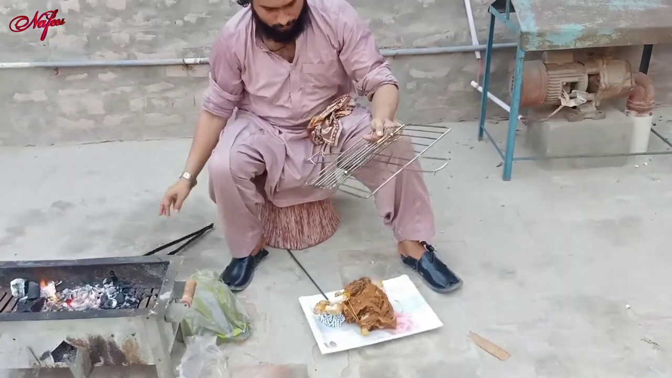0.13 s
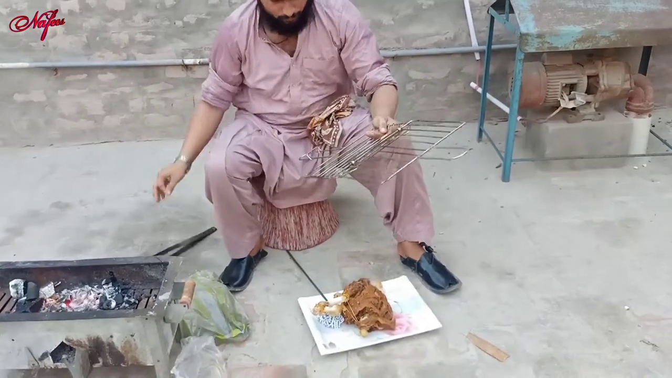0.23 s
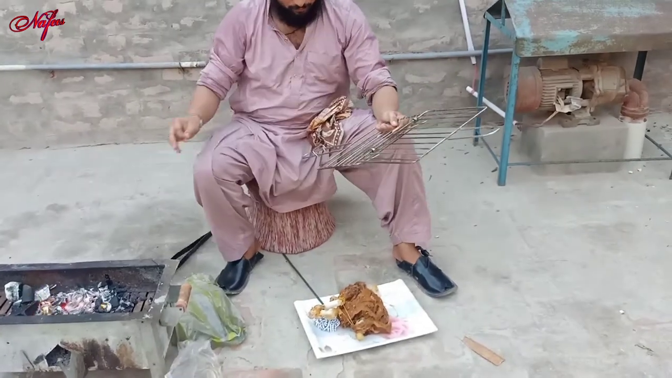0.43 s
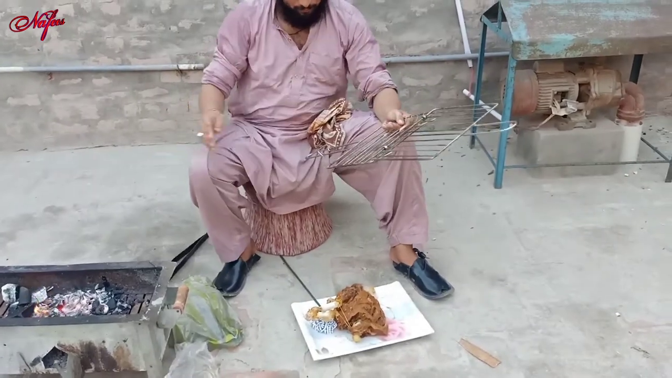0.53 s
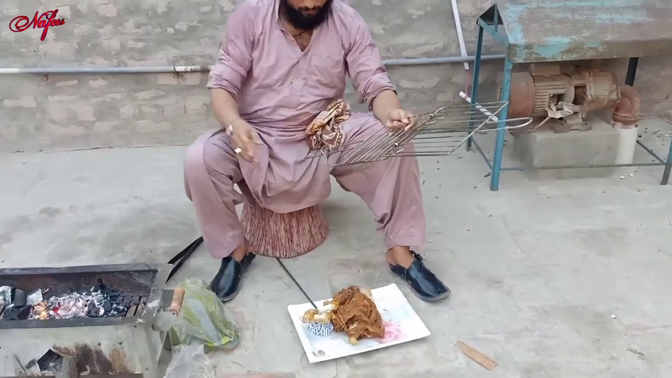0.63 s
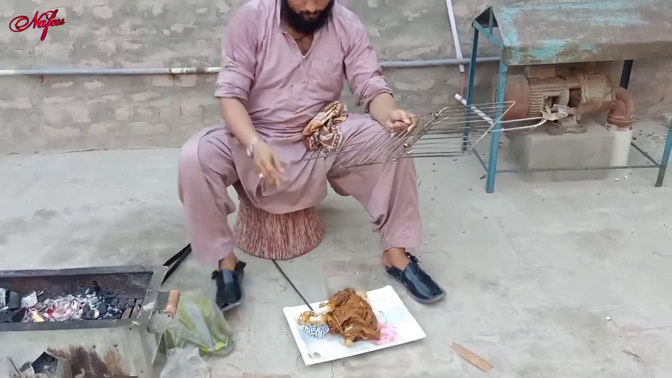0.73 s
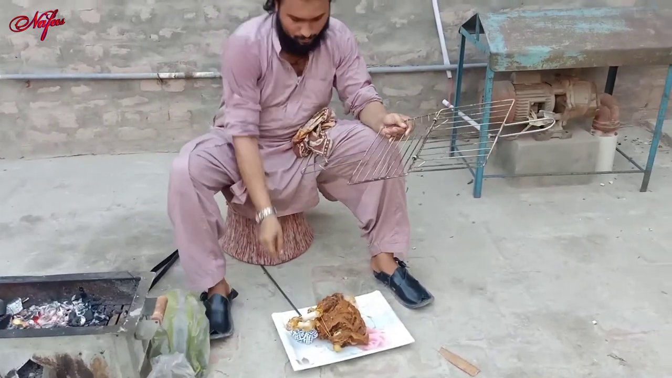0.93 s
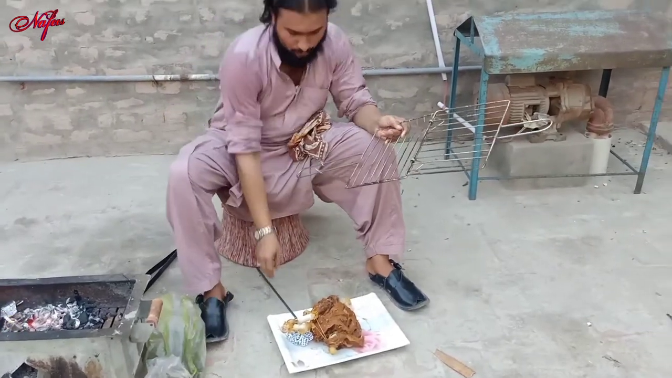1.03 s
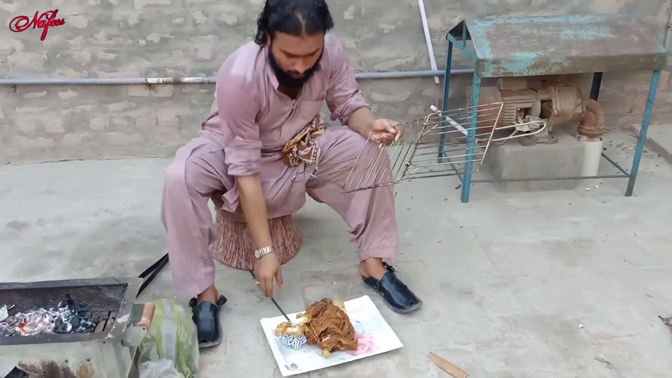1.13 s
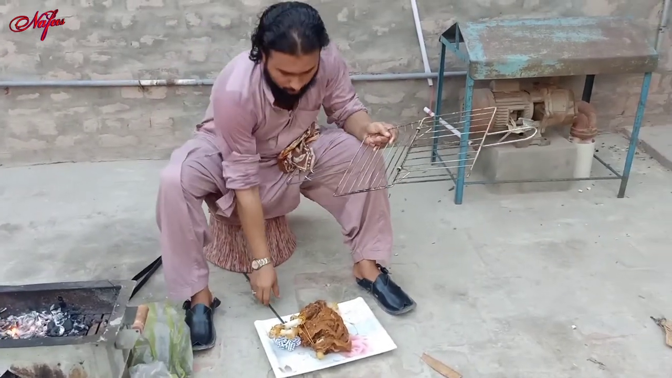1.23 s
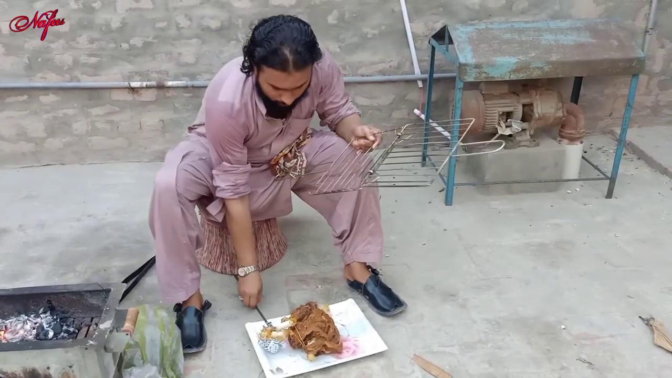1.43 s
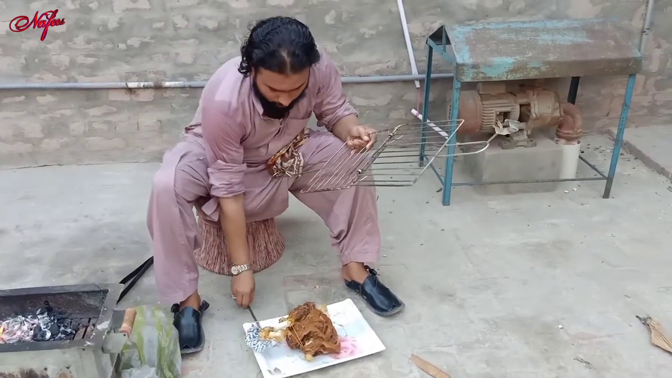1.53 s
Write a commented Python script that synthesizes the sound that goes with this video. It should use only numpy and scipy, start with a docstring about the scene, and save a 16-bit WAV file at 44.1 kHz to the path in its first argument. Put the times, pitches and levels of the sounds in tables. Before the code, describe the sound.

A sharp metallic clank of dropped tongs on hard ground, then a smaller clinking bounce beside ticking charcoal.

```python
"""A walled concrete yard, two microphone ports: steel tongs are dropped; they knock, bounce and ring.
The tongs are decaying steel modes, noise cracks, chatter and ground resonances; shaped noise is the walls' answer.
Hot charcoal ticks as short noise bursts and cloth rustles as patchy noise over the steady hiss of the yard.
A puff of wind buffets and thumps the right port, and faint sine hums come and go."""
import sys
import numpy as np
from scipy import signal
from scipy.fft import rfft, irfft, next_fast_len
from scipy.io import wavfile
from scipy.ndimage import uniform_filter1d, map_coordinates

SR = 44100
rng = np.random.default_rng(int(sys.argv[2]) if len(sys.argv) > 2 else 0)


def unload_audio(sound):
    """Save the sound as a 16-bit wav file, at the path given as the first command line argument."""
    columns = np.transpose(np.atleast_2d(sound))
    # keep every value between -1 and 1, then stretch to whole-number steps
    steps = np.round(np.clip(columns, -1, 1) * 32767)
    wavfile.write(sys.argv[1], SR, steps.astype(np.int16))


N = 68355  # length in samples

# Source levels are set ahead of the port balances and the microphone.
# Colour of the yard's hiss: [f/Hz, density/dB per Hz]
HISS_COLOUR = [(30, -25), (64, -8), (672, -9.5), (852, -16), (1050, -8), (1700, -10), (2580, -6.5),
               (3930, -22), (6840, -27), (9000, -41.5), (15000, -66), (16400, -81)]
# Likeness of the hiss at the two ports: [f/Hz, correlation]
HISS_LIKENESS = [(290, 0.9), (640, 0.074), (1410, -0.11), (3100, 0.14), (6820, -0.18)]
# Balance of the distant sounds: [f/Hz, left over right level/dB]
FAR_BALANCE = [(300, 1), (1290, 0), (2500, 9), (4400, 3.5), (8120, 4.5), (15000, 9)]
HISS_DB = -46

# Contacts of the tongs: [t/s, crack level/dB, ring level/dB]
CONTACTS = [(.005, -33.5, -53), (0.2159, -15, -43), (0.222, -33, -40.5), (0.227, -22.5, -40),
            (.357, -53, -49), (.522, -28, -44), (.524, -24, -40), (.535, -31.5, -45)]
# Modes of the steel jaws: [f/Hz, level/dB, t60/s]
JAW_MODES = [(2291, 4, 0.12), (2790, -9, 0.47), (3570, 0, 0.14), (4230, -6, 0.14), (4985, -19, 0.18),
             (5360, 6.5, 0.077), (6133, -1.5, 0.31), (6240, -4.5, 0.26), (8070, -1, 0.15), (8090, 0, 0.1),
             (9280, -14, 0.13), (10160, -14.5, 0.16), (10750, -18, 0.22), (11830, -34, 0.19),
             (13200, -22, 0.18), (15200, -9, 0.09)]
# Modes of the long arms: [f/Hz, level/dB, t60/s]
ARM_MODES = [(3085, -12, 0.37), (3126, 0, 0.2), (3492, -10, 0.27), (6224, -10.5, 0.29)]
# Moments the long arms are set ringing: [t/s, level/dB]
ARM_SWINGS = [(0.5231, -39), (.551, -25)]
# Colour of a crack between steel and concrete: [f/Hz, density/dB per Hz]
CRACK_COLOUR = [(400, -25.5), (1200, -13), (2400, -3), (3150, 1.5), (3980, -5.5), (5300, -6.5),
                (8300, -16.5), (9700, -27), (15500, -33), (16400, -70)]
# Balance of the near sounds: [f/Hz, left over right level/dB]
NEAR_BALANCE = [(200, -5.5), (700, 5.5), (1290, -6.5), (2600, 17), (4800, -2.5), (8120, 9.5), (15000, 4.5)]
JAWS_RISE_S, ARMS_RISE_S, CRACK_T60_S = 0.0024, 0.005, 0.045
JAWS_WAVER, ARMS_WAVER = 0.52, 0.5  # unevenness of the ring
# Many weak jaw modes, spread between two ends: f/Hz, level/dB, t60/s
FINE_COUNT, FINE_HZ, FINE_DB, FINE_T60_S = 26, (3320, 8980), (-7, -14.5), 0.25
LAG_S = 0.00016  # the left port hears the near sounds later

# Decay of the walls' answer: [f/Hz, t60/s]
YARD_T60 = [(200, 0.94), (1000, 1), (3000, 1), (12000, 0.64), (15200, 0.39)]
YARD_DB, YARD_DELAY = -13, 500  # level/dB, delay in samples

# Ticks of the charcoal: [t/s, body level/dB, treble level/dB]
TICKS = [(0.0603, -25.5, -41.5), (0.07, -45, -53), (0.4533, -34.5, -67), (0.824, -40.5, -53),
         (0.839, -36, -41), (0.926, -39.5, -52), (1.5244, -36, -49.5)]
# Colour of a tick's body: [f/Hz, density/dB per Hz]
TICK_BODY_COLOUR = [(1500, -24), (3300, -2.5), (4300, 0.5), (5100, -13.5), (6130, -3.5), (9000, -25.5),
                    (16400, -60)]
# Colour of a tick's treble: [f/Hz, density/dB per Hz]
TICK_TREBLE_COLOUR = [(6000, -40), (10000, -7), (13000, -16), (15300, -7), (16400, -5.5)]
TICK_T60_S = 0.0084

# Blows on the ground: [t/s, level/dB, duller above f/Hz]
KNOCKS = [(0.2159, 18.5, 4000), (.2222, 17.5, 600), (.239, 1, 606), (0.2764, -6, 1500)]
# Resonances of the ground slab: [f/Hz, width/Hz, level/dB]
GROUND_MODES = [(193, 22.4, -2), (402, 60, 7), (644, 91, 7), (779, 53, 5), (1016, 117, 8), (1285, 240, 6.5),
                (1770, 194, 7.5), (2540, 700, 1)]

RATTLE_START_S, RATTLE_PER_S = .225, 630
RATTLE_DB, RATTLE_FADE_T60_S, CHATTER_T60_S = -43, 1, 0.0083

# Course of the cloth rustle: [t/s, level/dB]
RUSTLE = [(.72, -62.5), (.83, -49.5), (1.0, -51), (1.07, -69)]
# Colour of the cloth: [f/Hz, density/dB per Hz]
CLOTH_COLOUR = [(1200, -29), (2700, 2.5), (4000, -15), (6500, -12), (9000, -20.5), (15000, -37.5),
                (16400, -42)]

# Course of the puff of wind: [t/s, level/dB]
GUST = [(.74, -37), (.8, -54), (.86, -64), (.9, -40), (.935, -50.5), (.995, -47), (1.07, -33), (1.165, -37),
        (1.19, -55)]
# Colour of the wind's buffeting: [f/Hz, density/dB per Hz]
BUFFET_COLOUR = [(25, -46), (55, -2), (100, -1.5), (180, -12.5), (350, -18.5), (600, -47), (1000, -91)]
# Distinct thumps of wind: [t/s, peak level/dB, f/Hz]
THUMPS = [(0.966, -21.5, 146), (1.015, -26.5, 97), (1.03, -27, 178), (1.055, -21.5, 200), (1.064, -14, 116),
          (1.084, -16.5, 276), (1.089, -15, 231), (1.101, -25, 139), (1.112, -23, 100), (1.128, -35, 100),
          (1.143, -30.5, 160), (1.158, -30, 110)]
THUMP_CYCLES = 0.55  # a thump is 7.6 dB down this many cycles from its centre

# Faint hums: [start t/s, end t/s, f/Hz, rms level/dB]
HUMS = [(1.045, 1.223, 307, -53), (1.322, 1.459, 312, -57), (1.367, 1.45, 383.4, -56.5)]
HUM_FADE_S = 0.021

LOW_CUT_HZ, TOP_HZ, CEILING = 45, 16400, .9  # microphone: bass corner, band limit, peak ceiling


def amp(db):
    """Gain for a level in dB."""
    return 10 ** (np.asarray(db) / 20)


def unit(x):
    """Scale to rms 1."""
    return x / np.sqrt(np.mean(x ** 2) + 1e-20)


def along(points, hz):
    """Interpolate [f/Hz, value] points on a log frequency axis."""
    f, value = np.transpose(points)
    return np.interp(np.log(hz + 1), np.log(f + 1), value)


def curve(rows):
    """Level/dB at each sample, -120 dB outside the span of the rows."""
    s, db = np.transpose(rows)
    return np.interp(np.arange(N) / SR, s, db, left=-120, right=-120)


def wobble(rate):
    """A smooth random curve with rate knots a second."""
    knots = rng.standard_normal(int(N * rate / SR) + 4)
    return map_coordinates(knots, [np.arange(N) * rate / SR])


def filtered(x, response):
    """Multiply the spectrum of x by a complex response of frequency."""
    m = next_fast_len(N + SR // 2)
    return irfft(rfft(x, m) * response(np.fft.rfftfreq(m, 1 / SR)), m)[..., :N]


def causal(colour):
    """A minimum-phase impulse of energy 1 with this colour, by folding the cepstrum."""
    cepstrum = irfft(np.log(amp(along(colour, np.fft.rfftfreq(2048, 1 / SR)))))
    folded = cepstrum * np.r_[1, 2 * np.ones(1023), 1, np.zeros(1023)]
    impulse = irfft(np.exp(rfft(folded)))[:1024]
    return impulse / np.linalg.norm(impulse)


def coloured(x, colour):
    """Give both channels the colour without sounding ahead of the onset."""
    return signal.fftconvolve(x, causal(colour)[None])[:, :N]


def rush(colour, likeness, patchy_db):
    """Stereo noise of rms 1, patchy in time and frequency, with a set likeness between the ports."""
    grains = signal.stft(rng.standard_normal((2, N + 512)), nperseg=512)[2]
    patches = uniform_filter1d(rng.standard_normal(grains.shape[1:]), size=6, axis=0)
    patches = uniform_filter1d(patches, size=8, axis=1)
    pair = signal.istft(grains * amp(patchy_db * unit(patches)), nperseg=512)[1][:, :N]

    def shares(hz):
        turn = np.arccos(np.clip(along(likeness, hz), -1, 1)) / 2
        return amp(along(colour, hz)) * [np.cos(turn), np.sin(turn)]

    mid, side = filtered(pair, shares)
    return unit(np.array([mid + side, mid - side]))


def bursts(times, levels_db, t60, apart):
    """Noise bursts that start at once and die exponentially; a share differs between the ports."""
    out, t = np.zeros((2, N + SR)), np.arange(SR // 10) / SR
    for s, db in zip(times, levels_db):
        noise = rng.standard_normal((3, len(t)))
        pair = noise[0] + apart * noise[1:]
        out[:, round(s * SR):][:, :len(t)] += amp(db - 60 * t / t60) * pair
    return out[:, :N]


def hiss():
    """Steady hiss of the yard: coloured noise with a slightly wavering level."""
    level_db = HISS_DB + 0.33 * wobble(14.85)
    return amp(level_db) * rush(HISS_COLOUR, HISS_LIKENESS, patchy_db=1.0)


def ring(modes, t, rise_s, waver):
    """Decaying modes with a fast, uneven waver; levels and phases are fresh and differ between the ports."""
    hz, db, t60 = np.transpose(modes)[:, :, None]
    count = len(modes)
    scatter_db = rng.normal(0, 2.5, (2, count, 1))
    phase = rng.uniform(0, 2 * np.pi, (count, 1)) + rng.normal(0, 0.72, (2, count, 1))
    knots = rng.standard_normal((2, count, 36))
    in_phase, quadrature = [
        np.array([np.interp(t, np.linspace(0, t[-1], len(k)), k) for k in part]) for part in knots]
    turn = 2 * np.pi * hz * t + phase
    wave = (1 + waver * in_phase) * np.sin(turn) + waver * quadrature * np.cos(turn)
    decaying = amp(db + scatter_db - 60 * t / t60) * wave
    return decaying.sum(1) * (1 - np.exp(-t / rise_s))


def tongs():
    """Each contact cracks and rings the jaws; ringing arms, ground knocks and chatter join in."""
    s, crack_db, ring_db = np.transpose(CONTACTS)
    out, t = np.zeros((2, N + SR)), np.arange(SR // 3) / SR
    fine = [(np.interp(u, (0, 1), FINE_HZ), np.interp(u, (0, 1), FINE_DB), FINE_T60_S)
            for u in rng.random(size=FINE_COUNT)]
    jaws = list(JAW_MODES) + fine
    for at, db in zip(s, ring_db):
        out[:, round(at * SR):][:, :len(t)] += amp(db) * ring(jaws, t, JAWS_RISE_S, JAWS_WAVER)
    for at, db in ARM_SWINGS:
        out[:, round(at * SR):][:, :len(t)] += amp(db) * ring(ARM_MODES, t, ARMS_RISE_S, ARMS_WAVER)
    cracks = coloured(bursts(s, crack_db, CRACK_T60_S, apart=1.0), CRACK_COLOUR)
    return out[:, :N] + cracks + knocks() + rattle()


def yard(x):
    """The walls' answer: a noise tail in which each frequency dies at its own speed."""
    hz, t, grains = signal.stft(rng.standard_normal((2, SR)), SR, nperseg=256)
    decay = amp(-60 * t / along(YARD_T60, hz)[:, None])
    tail = signal.istft(grains * decay, SR, nperseg=256)[1]
    late = np.pad(x, ((0, 0), (YARD_DELAY, 0)))
    return signal.fftconvolve(late, tail / np.linalg.norm(tail[0]), axes=1)[:, :N]


def charcoal():
    """Short dry noise ticks, each with its own share of treble."""
    s, body_db, treble_db = np.transpose(TICKS)
    body = coloured(bursts(s, body_db, TICK_T60_S, apart=0.78), TICK_BODY_COLOUR)
    treble = coloured(bursts(s, treble_db, TICK_T60_S, apart=0.78), TICK_TREBLE_COLOUR)
    return body + treble


def knocks():
    """Blows excite the resonances of the ground slab; dull blows reach mainly the low ones."""
    def ground(f):
        total = 0
        for k, (centre, width, db) in enumerate(GROUND_MODES):
            damping = 1j * f * width
            total = total + (-1) ** k * amp(db) * damping / (centre * centre - f * f + damping)
        return total

    def blows(f):
        total = 0
        for s, db, dull_hz in KNOCKS:
            delay = np.exp(-2j * np.pi * f * s)
            total = total + amp(db + rng.normal(0, 1)) * delay / (1 + 1j * f / dull_hz) ** 2
        return total

    click = np.r_[1., np.zeros(N - 1)]
    return filtered(click, lambda f: ground(f) * blows(f))


def rattle():
    """The jaws chatter after the drop: small noise bursts at random gaps, fading away."""
    draw = rng.random((200, 2))
    s = RATTLE_START_S - np.cumsum(np.log(draw[:, 0])) / RATTLE_PER_S
    fade_db = -60 * (s - RATTLE_START_S) / RATTLE_FADE_T60_S
    db = RATTLE_DB + fade_db - 2.4 * np.log(draw[:, 1])
    keep = s < N / SR
    return coloured(bursts(s[keep], db[keep], CHATTER_T60_S, apart=0.26), CRACK_COLOUR)


def cloth():
    """A rustle of cloth: patchy noise with a fluttering level."""
    level_db = curve(RUSTLE) + 0.69 * wobble(57.8)
    return amp(level_db) * rush(CLOTH_COLOUR, [(3000, 0.067)], patchy_db=1.2)


def wind():
    """A puff of wind at the right port, a trace at the left: low noise and short low thumps that swell and fade."""
    t = np.arange(N) / SR
    level_db = curve(GUST) + 1.1 * wobble(40.2)
    gust = amp(level_db) * rush(BUFFET_COLOUR, [(100, 0.008)], patchy_db=3.5)[0]
    for s, db, hz in THUMPS:
        swell = amp(db - 7.6 * ((t - s) * hz / THUMP_CYCLES) ** 2)
        gust = gust + swell * np.cos(2 * np.pi * hz * (t - s) + rng.normal(-0.43, 0.23))
    return np.outer([.02, 1], gust)


def hums():
    """Faint steady sines, each faded in and out."""
    t = np.arange(N) / SR
    out = np.zeros(N)
    for start, end, hz, db in HUMS:
        fade = np.clip(np.minimum(t - start, end - t) / HUM_FADE_S, 0, 1)
        out += np.sqrt(2) * amp(db) * fade * np.sin(2 * np.pi * hz * t)
    return out


def scene():
    """Near and distant sources, each group balanced between the ports by frequency, then the wind."""
    def balance(table, hz):
        return amp(np.outer([.5, -.5], along(table, hz)))

    def near_path(hz):
        lag = np.exp(-1j * np.pi * np.outer([1, -1], hz) * LAG_S)  # half the lag to each port
        return balance(NEAR_BALANCE, hz) * lag

    near = filtered(tongs() + charcoal(), near_path)
    echo = amp(YARD_DB) * yard(near.mean(axis=0, keepdims=True))
    far = hiss() + cloth() + hums() + echo
    return near + filtered(far, lambda hz: balance(FAR_BALANCE, hz)) + wind()


def record(dry):
    """The microphone drops the deep bass, rounds off peaks and keeps nothing above the band limit."""
    x = filtered(dry, lambda hz: (1j * hz / (LOW_CUT_HZ + 1j * hz)) ** 2)
    x = x / (1 + (x / CEILING) ** 4) ** .25
    return filtered(x, lambda hz: hz < TOP_HZ)


dry = scene()
out = record(dry)
unload_audio(out)
```